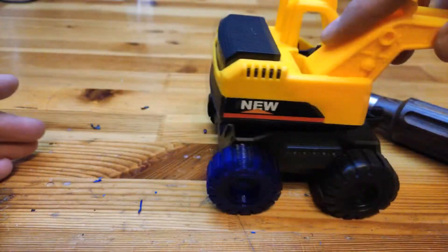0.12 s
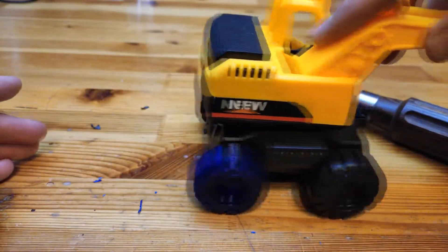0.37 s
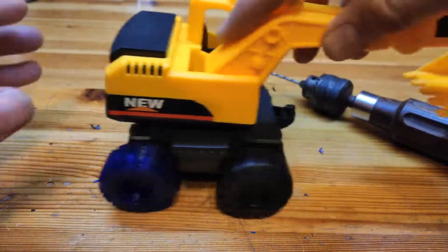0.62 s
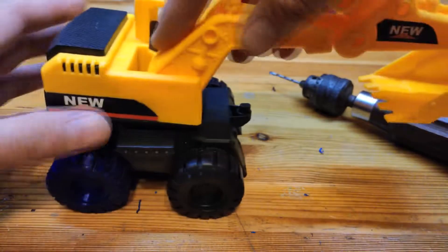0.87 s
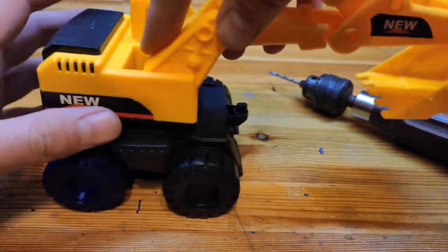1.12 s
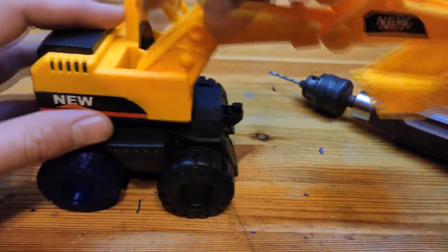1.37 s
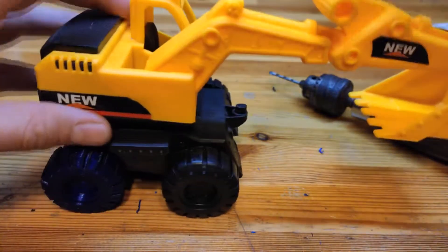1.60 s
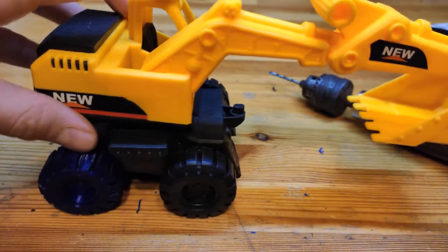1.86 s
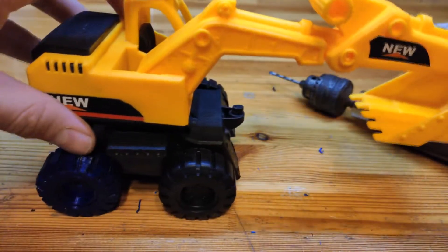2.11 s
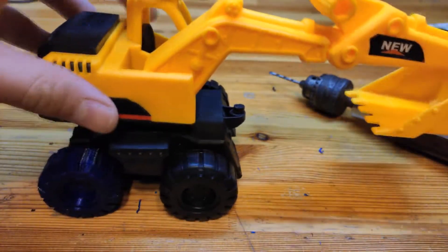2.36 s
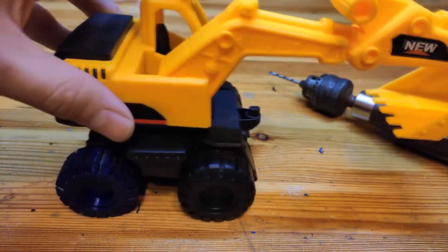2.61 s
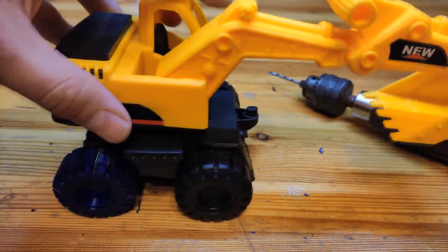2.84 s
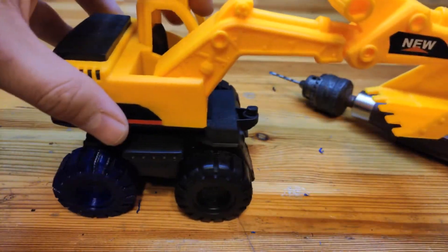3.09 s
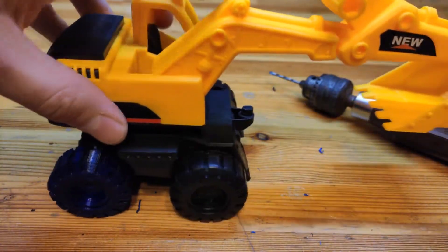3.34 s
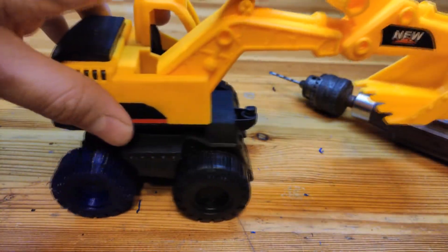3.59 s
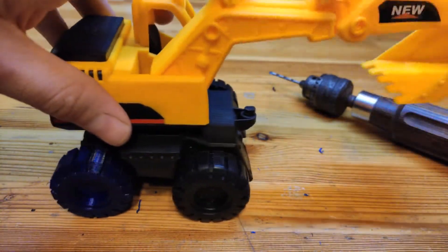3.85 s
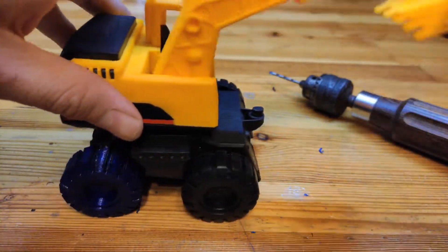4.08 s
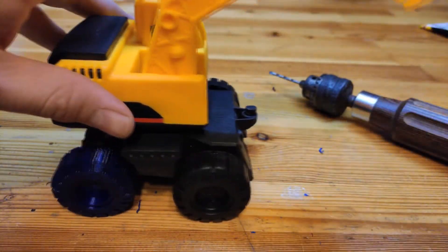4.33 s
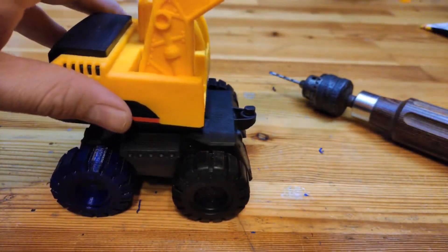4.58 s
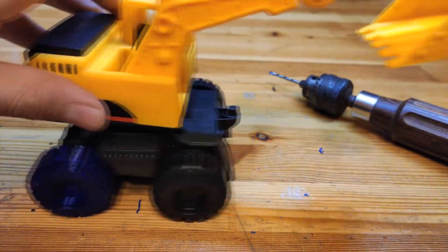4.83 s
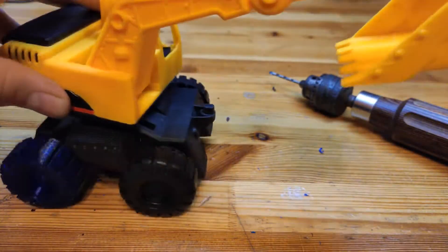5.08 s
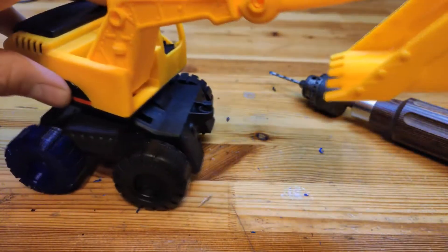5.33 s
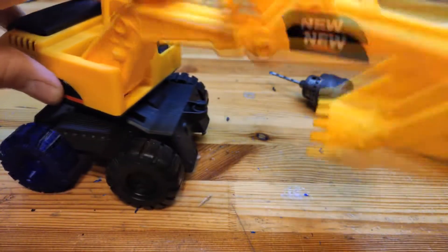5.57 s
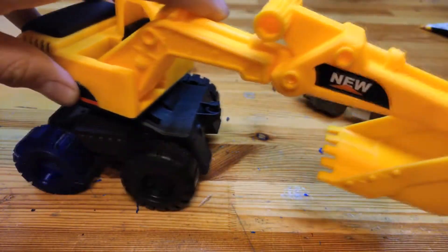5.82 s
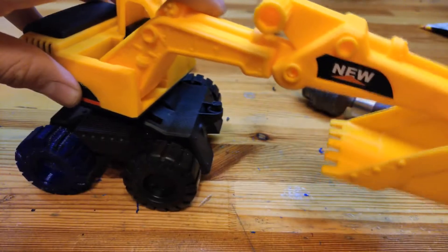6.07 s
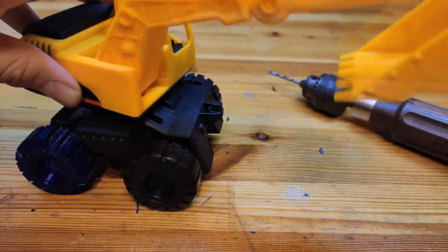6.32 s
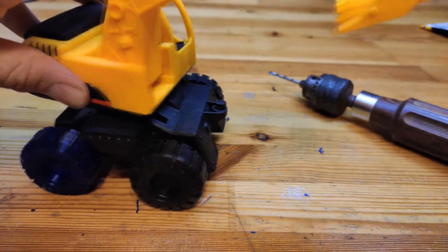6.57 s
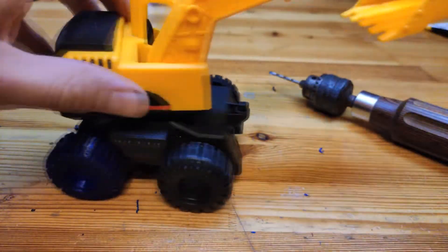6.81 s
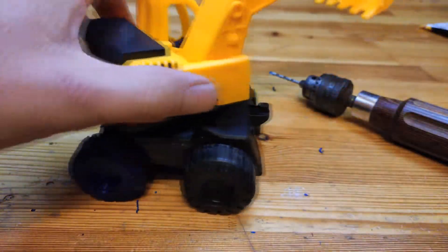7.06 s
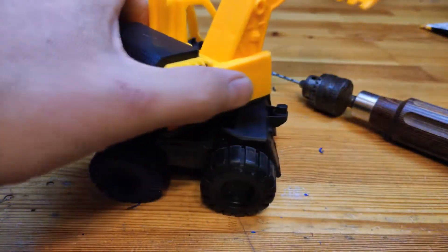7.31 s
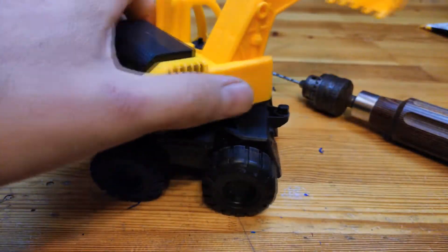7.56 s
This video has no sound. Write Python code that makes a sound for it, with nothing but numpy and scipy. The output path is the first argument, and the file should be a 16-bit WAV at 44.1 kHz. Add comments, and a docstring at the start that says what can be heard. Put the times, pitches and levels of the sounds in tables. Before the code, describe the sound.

Close stereo pickup of hands working a light plastic toy on a wooden table in a quiet indoor space. It opens with a low bump and whirring ratchet ticks, then clattering knocks and a strong hollow clack. Quiet handling, skin strokes and isolated ticks lead to a second roll, a short grating wheel twist, two crisp snaps, and closing clicks and dull taps.

```python
"""A hollow plastic toy digger is pushed and handled on a wooden table in a quiet room, heard by two close microphone ports.
It starts with a shove and ticking gears; knocks, taps, drags and finger strokes follow, with the hardest tap near 1.6 s.
Sparser touches lead to a shove at 4.8 s, a sideways scrub of the wheels from 5.1 s, sharp clicks at 5.7 s and last gear runs.
Blows and shaking ring modes of table, cab and panels; gear teeth are tiny blows; fingers and scrubbing wheels are shaped grit.
Room hush with a slow sub-bass sway, made of filtered noise, lies under it all."""
import sys
import numpy as np
from scipy import signal
from scipy.fft import rfft, irfft
from scipy.io import wavfile
from scipy.ndimage import uniform_filter1d, map_coordinates

SR = 44100
rng = np.random.default_rng(int(sys.argv[2]) if len(sys.argv) > 2 else 0)


def master(y):
    """Save y as 16-bit WAV."""
    cut = np.clip(np.atleast_2d(y).T, -1, 1)
    pcm = np.round(cut * 32767)  # scale
    wavfile.write(sys.argv[1], SR, pcm.astype(np.int16))


def attenuation_scalar(level_db):
    """Turn a level in dB into a linear amplitude multiplier (20 dB per decade)."""
    decades = np.asarray(level_db, float) / 20
    return 10 ** decades


N = 338688

# colour of the room hush: (frequency [Hz], density [dB per Hz, relative])
HUSH_COLOUR = [(2, 5.5), (16, -2), (37, -10.5), (70, -18), (200, -28), (1000, -41.5), (3000, -45),
               (8500, -57.5), (16000, -47)]
# colour of skin sliding on plastic: (frequency [Hz], density [dB per Hz, relative])
BRUSH_COLOUR = [(300, 16.5), (1500, 15), (3800, 19.5), (16000, 2.5)]
# finger strokes: (middle [s], length [s], level [dB])
FINGER_STROKES = [(0.903, 0.14, -52), (1.246, 0.48, -58), (1.331, 0.05, -52.5), (1.55, 0.088, -50),
                  (2.28, 0.085, -50.5), (2.44, 0.11, -50.5), (2.59, 0.026, -49.5), (2.708, 0.037, -51),
                  (3.308, 0.023, -54.5), (3.481, 0.12, -52.5), (4.132, 0.032, -54.5), (4.738, 0.13, -54.5),
                  (5.434, 0.084, -54), (5.718, 0.11, -51), (6.934, 0.096, -52.5), (7.147, 0.15, -50.5),
                  (7.593, 0.06, -55)]
# wheels scrub sideways as the toy twists: (time [s], pitch [Hz], level [dB])
WHEEL_SCRUB = [(5.061, 721, -44.5), (5.154, 850, -40), (5.249, 676.5, -46.5), (5.362, 573, -59)]
# a wheel or the bucket drags briefly: (middle [s], length [s], pitch [Hz], level [dB])
SHORT_DRAGS = [(1.056, 0.025, 2200, -41.5), (1.057, 0.03, 530, -41.5), (1.48, 0.03, 1905, -48),
               (2.419, 0.025, 430, -51), (4.707, 0.21, 1099, -54.5), (6.52, 0.17, 2320, -63),
               (6.742, 0.028, 400.4, -44)]
# gear runs, each a list of (time [s], speed [teeth per s]); the first tooth falls at the first row
GEAR_RUNS = [
    [(0, 194), (.09, 112), (.205, 89)],
    [(.306, 27), (.4, 92), (.58, 243), (.78, 224), (.88, 42)],
    [(2.545, 66), (2.67, 100)],
    [(2.836, 20.5), (3.02, 69)],
    [(3.65, 23.4), (3.76, 50)],
    [(4.84, 95), (4.97, 83), (5.22, 63)],
    [(5.783, 62), (5.935, 53)],
    [(6.645, 36.5), (6.73, 91), (7, 55), (7.24, 114)],
]
# shoves and jolts by hand: (start [s], held [s], tabletop rumble [dB], cab rattle [dB])
HAND_SHOVES = [(0, 0.019, -34, -39.5), (.09, 0.084, -52.5, -63.5), (.402, 0.06, -52.5, -50),
               (0.505, 0.24, -41.5, -44.5), (1.044, 0.0091, -44, -48.5), (1.513, 0.061, -44.5, -42),
               (2.441, 0.042, -51, -57), (2.67, 0.013, -52, -51.5), (4.13, 0.035, -48, -53),
               (4.817, 0.21, -53.5, -57), (5.065, 0.11, -47, -49.5), (5.21, 0.043, -36, -51),
               (6.4, 0.0087, -54.5, -52.5), (6.722, 0.034, -51, -51), (6.83, 0.012, -45, -56)]
# a hand resting on the toy fidgets: (from [s], to [s])
HAND_RESTS = [(1.098, 4.08), (5.302, 5.6), (6.5, 7.68)]
# knocks: (time [s], edge click [dB], panels [dB], cab [dB])
HARD_KNOCKS = [(0.047, -53, -43.5, -47), (0.5224, -53, -37, -40), (0.5837, -39.5, -40.5, -38.5),
               (0.694, -49, -45, -43), (0.7257, -46, -57, -37.5), (0.7816, -45, -48.5, -35.5),
               (1.043, -53, -37.5, -48), (1.527, -44, -33, -40), (1.5632, -48, -40, -46),
               (1.571, -37.5, -33.5, -33.5), (1.5793, -35, -34, -46), (2.327, -41.5, -43.5, -39),
               (2.671, -64, -57, -39.5), (3.699, -47.5, -76, -71), (3.8562, -56, -56, -49.5),
               (4.8, -35, -31.5, -34.5), (5.524, -57.5, -55, -50), (5.691, -23, -33, -72),
               (5.6937, -42, -39, -49), (5.695, -23, -37, -50), (5.752, -53.5, -47.5, -51.5),
               (6.2597, -42, -49.5, -62.5), (6.393, -52, -53, -41), (6.7732, -52, -43, -36),
               (6.8361, -69, -47, -39.5), (6.8756, -68, -40.5, -38), (7.2499, -41, -36, -33)]
# dull taps on the cab: (time [s], level [dB], pitch of the spot struck [Hz])
DULL_TAPS = [(0.499, -35.5, 1150), (0.658, -35, 1267), (1.0112, -41, 1020), (1.299, -44, 1090),
             (1.34, -43, 1040), (1.3736, -42, 1100), (1.584, -36, 1050), (1.5888, -21.5, 1095),
             (2.503, -39, 950), (2.595, -43, 1100), (3.2273, -46, 1260), (3.58, -43, 1250),
             (5.9293, -43.5, 1170), (6.716, -52, 990), (6.854, -34, 895), (7.2464, -35, 1040),
             (7.282, -34.5, 1024), (7.5654, -42, 1280), (7.638, -38, 994)]
# ringing modes of each part: (frequency [Hz], time to fall by 60 dB [s], relative level [dB])
TABLETOP_MODES = [(108.1, 0.25, -8), (171, 0.068, 3.5), (351.5, 0.092, -6.5), (461.6, 0.033, -2)]
CAB_MODES = [(923, 0.065, -5.5), (1004, 0.027, -5.5), (1147, 0.015, 9.5), (1351, 0.023, -0.5)]
PANEL_MODES = [(2050, 0.0068, -5.5), (2436, 0.016, 1.1), (2765, 0.005, 5.5), (3860, 0.0019, 14)]
TOOTH_MODES = [(2330, 0.014, 1.6667), (2555, 0.013, 6), (3340, 0.0064, 10.2), (7850, 0.0099, 0.5),
               (8530, 0.009, 5.5)]
# overall colour: treble resonance, notch, and a steep cutoff near 16.5 kHz: (frequency [Hz], gain [dB])
OVERALL_COLOUR = [(20, -5), (6300, 1.5), (8500, 8), (9400, 1.5), (10300, -8), (12800, -3.5), (16000, -5),
                  (16900, -67)]
# extra loss of the shaded treble at the right port: (frequency [Hz], gain [dB])
RIGHT_PORT_SHADE = [(9500, -2), (11500, -4)]

HUSH_DB, HUSH_LEFT_MORE_DB = -41, 1.5
ROOM_DB, ROOM_T60_S = -6.5, 0.11
BODY_LEFT_LAG_S, BRIGHT_LEFT_LAG_S = 0.00018, 0.00014
BODY_LEFT_MORE_DB, BRIGHT_LEFT_MORE_DB = 3, 3
UNEVEN_DB = 2  # spread of mode strengths from blow to blow; also sets the drift in wander()
GRIT_DB = 2.2  # mean extra size of the tiny impacts
BLOW_HZ = 80  # blow levels are counted over 1/80 s
CAB_CLEAN = 0.7  # share of clean push in a blow; the rest is chatter
SPOT_DB_PER_OCTAVE = 30  # modes away from the spot's pitch ring less
EDGE_DECAY_S = 0.002
STROKE_START, STROKE_END = 4, 1.5  # steepness of the swell and of the fade
SHOVE_RISE_DB_S, SHOVE_FALL_DB_S = 1200, 153
REST_WOOD_DB, REST_CAB_DB = -62, -65.5
TICK_DB, TICK_DB_PER_DOUBLING = -60, 5  # at 100 teeth per s; faster teeth hit harder
SCRUB_WIDTH_HZ, DRAG_WIDTH = 500, 0.32  # drag width as a share of its pitch
THUD_DB = -11  # relative to the shaking of the wood


def level(x, db):
    """Scale to an rms level."""
    return x * attenuation_scalar(db) / np.sqrt(np.mean(x ** 2))


def highpass(x, hz, order=2):
    """Take away what lies below a frequency."""
    return signal.sosfilt(signal.butter(order, hz, "high", fs=SR, output="sos"), x)


def bandpass(x, low_hz, high_hz):
    """Keep what lies between two frequencies."""
    return signal.sosfilt(signal.butter(2, [low_hz, high_hz], "band", fs=SR, output="sos"), x)


def colour(x, points):
    """Causal filter through (Hz, dB) points, built from the cepstrum of the log gain."""
    hz, db = np.transpose(points)
    size = 2 ** 16
    f = np.maximum(np.arange(size // 2 + 1) * SR / size, 1)
    cepstrum = irfft(np.log(attenuation_scalar(np.interp(np.log(f), np.log(hz), db))))
    # folding the second half onto the first makes the filter causal
    cepstrum[1:size // 2] *= 2
    cepstrum[size // 2 + 1:] = 0
    response = irfft(np.exp(rfft(cepstrum)))[None, :size // 2]
    return signal.fftconvolve(x, response, axes=1)[:, :N]


def wander():
    """A gain that drifts at random by a few dB within some 30 ms."""
    hold = SR // 30
    steps = np.repeat(rng.standard_normal(N // hold + 1), hold)[:N]
    return attenuation_scalar(2 * UNEVEN_DB * uniform_filter1d(steps, size=hold))


def grit(per_s):
    """Random tiny impacts of unequal size, rms 1."""
    hit = rng.random(N) < per_s / SR
    size = rng.standard_normal(N) * attenuation_scalar(GRIT_DB * rng.exponential(size=N))
    return level(hit * size, 0)


def spikes(s, gain):
    """Impulses of the given sizes at the given times."""
    out = np.zeros(N)
    np.add.at(out, np.clip((s * SR).astype(int), 0, N - 1), gain)
    return out


def bursts(s, gain, decay_s):
    """Noise bursts that swell and die; gain is the rms each adds over its first 1/80 s."""
    keep = np.exp(-2 / (decay_s * SR))
    size = np.sqrt((1 - keep ** 2) ** 3 / (1 + keep ** 2) * SR / BLOW_HZ)
    swell = signal.lfilter([size], [1, -2 * keep, keep ** 2], spikes(s, gain))
    return swell * rng.standard_normal(N)


def ring(modes, shake, s, blow_db, chatter_s, clean, spot_hz=None):
    """Modes driven by shaking and by blows; a blow is part clean push, part chatter, and favours other modes each time."""
    hz, t60, db = np.transpose(modes)
    pole = np.exp(2j * np.pi * hz / SR - np.log(1000) / (t60 * SR))
    one_blow = (attenuation_scalar(db) * pole ** np.arange(SR // 4)[:, None]).imag.sum(axis=1)
    strength = attenuation_scalar(blow_db[:, None] + UNEVEN_DB * rng.standard_normal((len(s), len(hz))))
    if spot_hz is not None:
        octaves_away = abs(np.log2(hz / spot_hz[:, None]))
        strength = strength * attenuation_scalar(-SPOT_DB_PER_OCTAVE * octaves_away)
    out = 0
    for k, p in enumerate(pole):
        push = spikes(s, strength[:, k]) * np.sqrt(SR / BLOW_HZ)
        chatter = bursts(s, strength[:, k], chatter_s)
        drive = shake * wander() + clean * push + np.sqrt(1 - clean ** 2) * chatter
        out = out + attenuation_scalar(db[k]) * signal.lfilter([0, p.imag], [1, -2 * p.real, abs(p) ** 2], drive)
    return out / np.linalg.norm(one_blow)


def hush():
    """Room hush and sub-bass sway: coloured noise, more alike at both ports from 40 to 400 Hz."""
    air = rng.standard_normal((2, N))
    # long waves reach both ports alike
    long_waves = bandpass(air, 40, 400)
    air = air + 0.21 * (long_waves.sum(axis=0) / np.sqrt(2) - long_waves)
    return level(colour(air, HUSH_COLOUR), HUSH_DB)


def room(x):
    """Nearby surfaces return a short, different tail to each port."""
    t = np.arange(int(0.4 * SR)) / SR
    tail = rng.standard_normal((2, len(t))) * attenuation_scalar(-60 * t / ROOM_T60_S) * (t > 0.0015)
    tail = highpass(tail, 400, order=1)
    tail = attenuation_scalar(ROOM_DB) * tail / np.linalg.norm(tail[0])
    return signal.fftconvolve(x[None], tail, axes=1)[:, :N]


def fingers():
    """Skin sliding on plastic: fine grainy hiss that sets in quickly and fades with each stroke."""
    swell = 0
    for middle, length, db in FINGER_STROKES:
        place = 2 * (np.arange(N) / SR - middle) / length
        steepness = np.where(place < 0, STROKE_START, STROKE_END)
        swell = swell + attenuation_scalar(db) * np.exp(-abs(place) ** steepness)
    return swell * level(colour(grit(15000)[None], BRUSH_COLOUR)[0], 0)


def slip(hz, width_hz, per_s):
    """Stick-slip jerks ringing a band whose centre may move, rms 1."""
    lowpass = signal.butter(2, width_hz / 2, fs=SR, output="sos")
    slow = [signal.sosfilt(lowpass, grit(per_s)) for _ in range(2)]
    turn = 2 * np.pi * np.cumsum(hz) / SR
    return level(slow[0] * np.cos(turn) + slow[1] * np.sin(turn), 0)


def scrub():
    """Tyre lugs stick and slip on the wood: one twist whose pitch rises, then sags, and short drags."""
    t = np.arange(N) / SR
    s, hz, db = np.transpose(WHEEL_SCRUB)
    twist = slip(np.interp(t, s, hz), SCRUB_WIDTH_HZ, 1100) * attenuation_scalar(np.interp(t, s, db))
    out = twist * np.sqrt(wander()) * (t > s[0]) * (t < s[-1])
    for middle, length, hz, db in SHORT_DRAGS:
        swell = attenuation_scalar(db) * np.exp(-(2 * (t - middle) / length) ** 2)
        out = out + swell * slip(np.full(N, hz), DRAG_WIDTH * hz, 1500)
    return out


def gear():
    """Tooth times and levels: one tick each time the turning phase passes a whole tooth."""
    times, peaks = [], []
    for run in GEAR_RUNS:
        s, rate = np.transpose(run)
        t = np.arange(s[0], s[-1], 1 / SR)
        turned = np.cumsum(np.interp(t, s, rate)) / SR
        teeth = np.interp(np.arange(int(turned[-1]) + 1), turned, t)
        speed = np.interp(teeth, s, rate)
        chance = rng.standard_normal((len(teeth), 2))  # no two teeth are quite alike
        times.append(teeth + 0.03 * chance[:, 0] / speed)
        peaks.append(TICK_DB + TICK_DB_PER_DOUBLING * np.log2(speed / 100) + 2.2 * chance[:, 1])
    return np.concatenate(times), np.concatenate(peaks)


def axle_jiggle(tooth_s, tooth_db):
    """The faster and harder the gears turn, the more the axles jiggle in their seats."""
    power = uniform_filter1d(spikes(tooth_s, attenuation_scalar(2 * tooth_db)), size=2000).clip(0)
    return np.sqrt(power * SR / BLOW_HZ) * grit(2500)


def hold_shape(s, held):
    """How strongly a hand acts: a quick rise, a hold, then a slower fall."""
    t = np.arange(N) / SR
    before, after = (s - t).clip(0), (t - s - held).clip(0)
    return attenuation_scalar(-SHOVE_RISE_DB_S * before - SHOVE_FALL_DB_S * after)


def contact():
    """Shoves shake wood and cab; a resting hand stirs the wood and makes the cab crackle faintly."""
    wood, rattle = 0, 0
    for s, held, wood_db, cab_db in HAND_SHOVES:
        shove = hold_shape(s, held)
        wood = wood + attenuation_scalar(wood_db) * shove
        rattle = rattle + attenuation_scalar(cab_db) * shove
    resting = sum(hold_shape(a, b - a) for a, b in HAND_RESTS)
    return wood + attenuation_scalar(REST_WOOD_DB) * resting, rattle, attenuation_scalar(REST_CAB_DB) * resting


def edge_clicks(fizz, s, db):
    """Hard edges meeting: high noise that dies within milliseconds, over the thin fizz of the axles."""
    snap = highpass(bursts(s, attenuation_scalar(db), EDGE_DECAY_S), 3900)
    return snap + highpass(fizz, 9500)


def wooden_table(wood, at, cab_db):
    """Knocks on the cab pass through the wheels into tabletop modes, kept above about 95 Hz, with a low thud under shoves."""
    tabletop = ring(TABLETOP_MODES, wood * grit(4000), at, cab_db - 2.5, chatter_s=0.017, clean=0.35)
    # the whole table sways under each shove
    thud = wood * level(bandpass(rng.standard_normal(N), 55, 120), THUD_DB)
    return highpass(tabletop, 95) + thud


def hollow_cab(shake, at, cab_db, tap_s, tap_db, tap_hz):
    """Knocks, taps and loose parts ring the cab; the sound is kept above about 720 Hz."""
    knocked = ring(CAB_MODES, shake, at, cab_db, chatter_s=0.0021, clean=CAB_CLEAN)
    tapped = ring(CAB_MODES, 0, tap_s, tap_db, chatter_s=0.005, clean=CAB_CLEAN, spot_hz=tap_hz)
    return highpass(knocked + tapped, 720)


def toy():
    """All sounds of the toy: the low body (tabletop, cab, scrub) and the bright parts."""
    wood, rattle, fidget = contact()
    at, edge_db, panel_db, cab_db = np.transpose(HARD_KNOCKS)
    tap_s, tap_db, tap_hz = np.transpose(DULL_TAPS)
    tooth_s, tooth_db = gear()
    loose = rattle * grit(1200)
    crackle = fidget * grit(350)
    jiggle = axle_jiggle(tooth_s, tooth_db)
    body = wooden_table(wood, at, cab_db) + scrub()
    body = body + hollow_cab(loose + crackle, at, cab_db, tap_s, tap_db, tap_hz)
    # loose parts, axles and taps stir the thin panels; the axles also fizz at the hard edges
    panel_shake = attenuation_scalar(-3.5) * loose + attenuation_scalar(-4.5) * jiggle
    blow_s, blow_db = np.r_[at, tap_s], np.r_[panel_db, tap_db - 14]
    panels = ring(PANEL_MODES, panel_shake, blow_s, blow_db, chatter_s=0.0019, clean=0.35)
    teeth = ring(TOOTH_MODES, 0, tooth_s, tooth_db, chatter_s=0.00016, clean=0.82)
    rims = edge_clicks(attenuation_scalar(5) * jiggle, at, edge_db)
    return body, panels + teeth + rims + fingers()


def late(x, lag_s):
    """A tiny delay that drifts at random, widening the stereo image."""
    return map_coordinates(x, [np.arange(N) - lag_s * SR * np.sqrt(wander())], mode="nearest")


def scene():
    """The toy stands nearer the right port; the left one hears it later but louder."""
    body, bright = toy()
    sides = np.array([[0.5], [-0.5]])  # half of each level difference goes to either side
    low = np.array([late(body, BODY_LEFT_LAG_S), body]) + room(body)
    high = np.array([late(bright, BRIGHT_LEFT_LAG_S), bright]) + room(bright)
    low = attenuation_scalar(BODY_LEFT_MORE_DB * sides) * low
    high = attenuation_scalar(BRIGHT_LEFT_MORE_DB * sides) * high
    return low + high + attenuation_scalar(HUSH_LEFT_MORE_DB * sides) * hush()


def low_pass(x):
    """Removes everything above the highest recorded frequency."""
    return signal.sosfilt(signal.butter(12, 15900, fs=SR, output="sos"), x)


def record(dry):
    """Both channels get a treble resonance, a notch above and a steep cutoff; the right port's treble is shaded."""
    heard = colour(dry, OVERALL_COLOUR)
    right = colour(heard[1:], RIGHT_PORT_SHADE)[0]
    return low_pass(np.array([heard[0], right]))


dry = scene()
out = record(dry)
master(out)
```